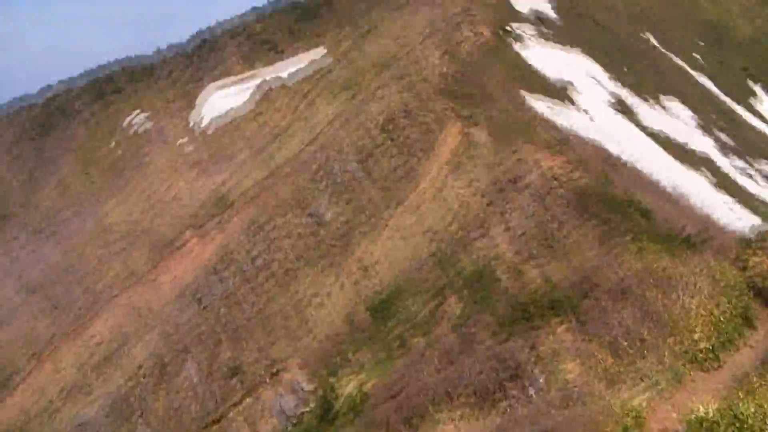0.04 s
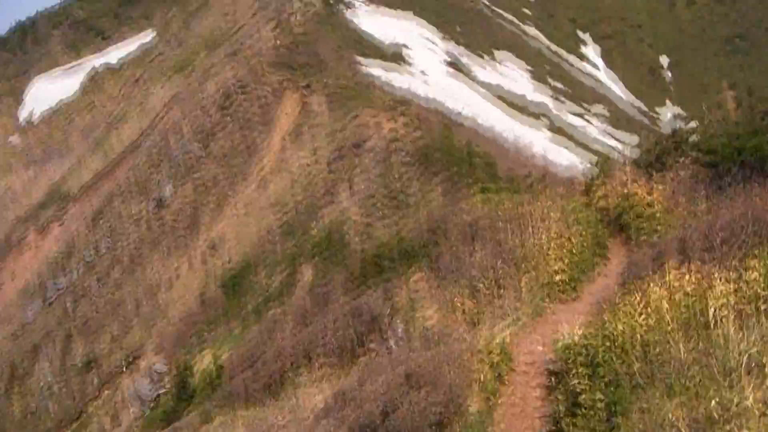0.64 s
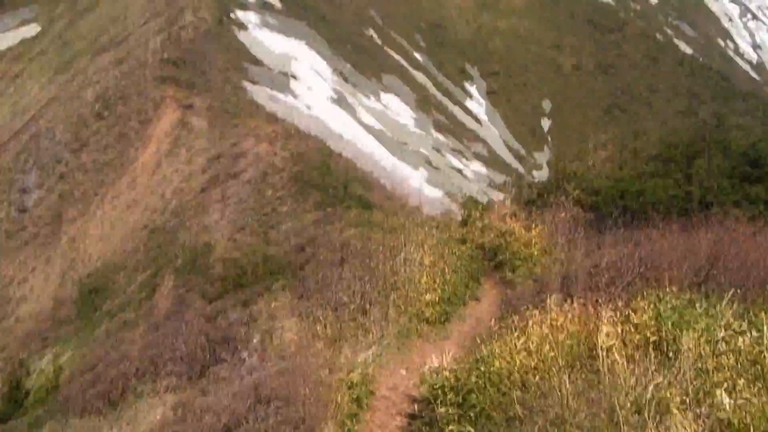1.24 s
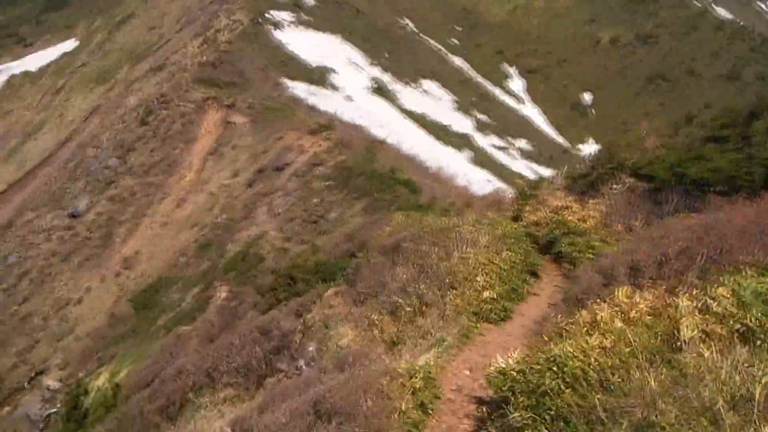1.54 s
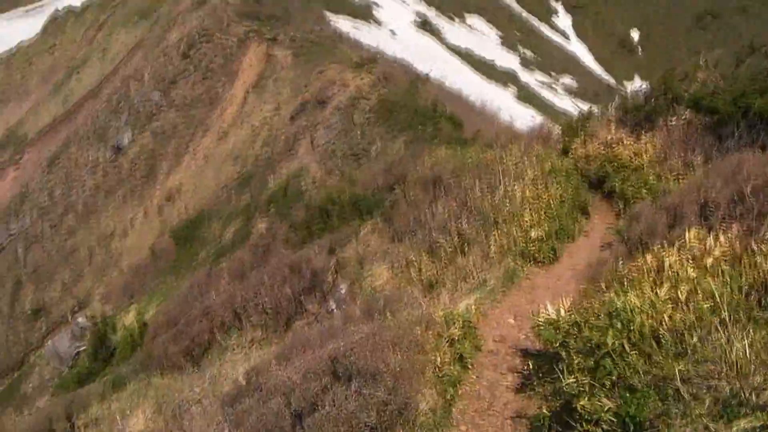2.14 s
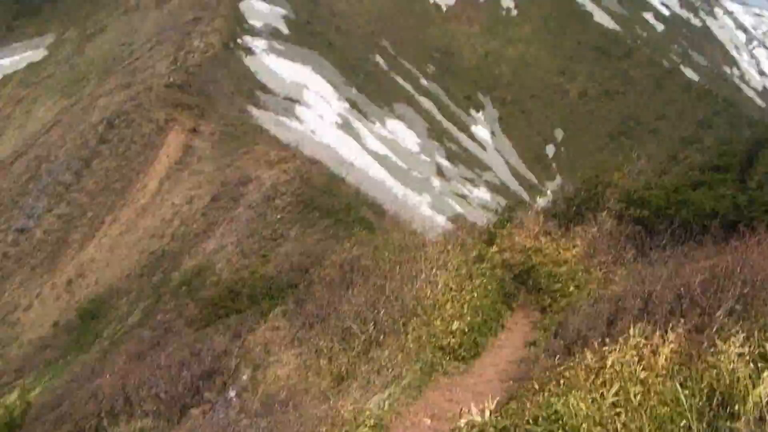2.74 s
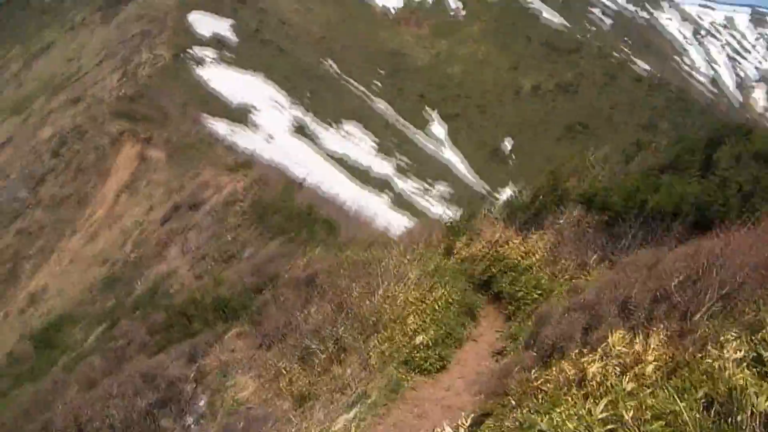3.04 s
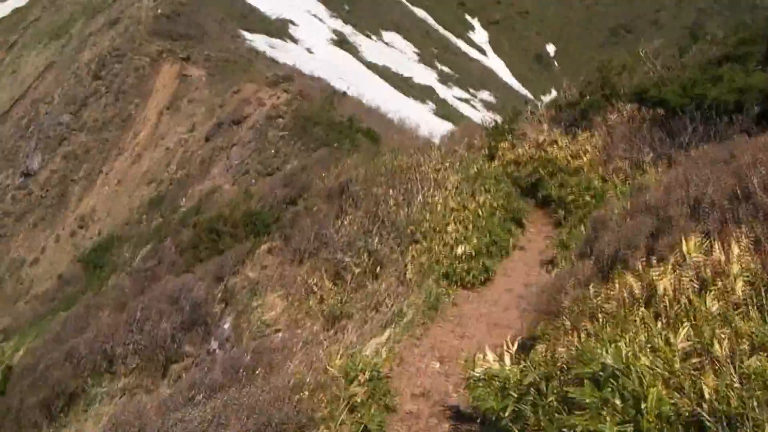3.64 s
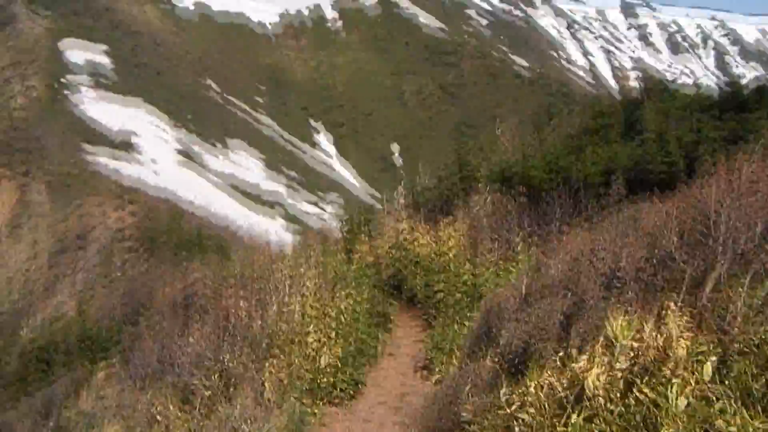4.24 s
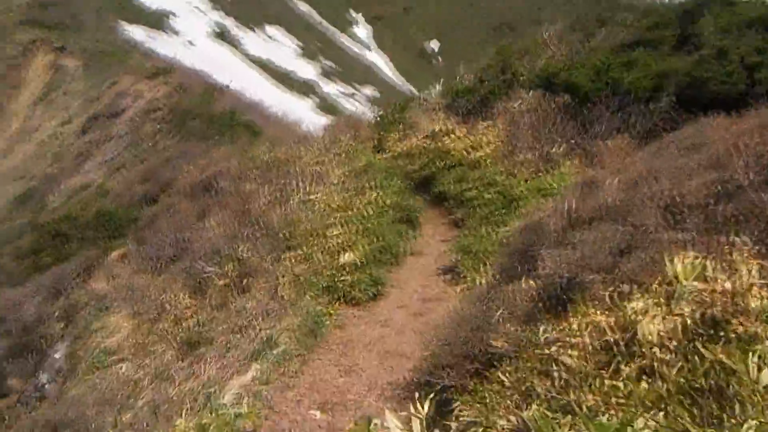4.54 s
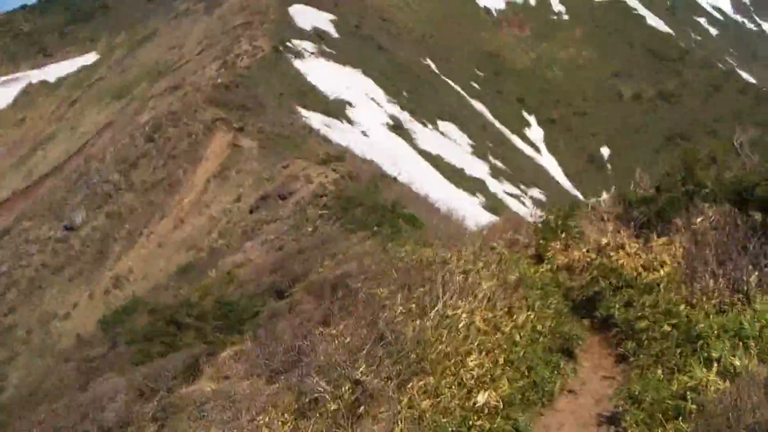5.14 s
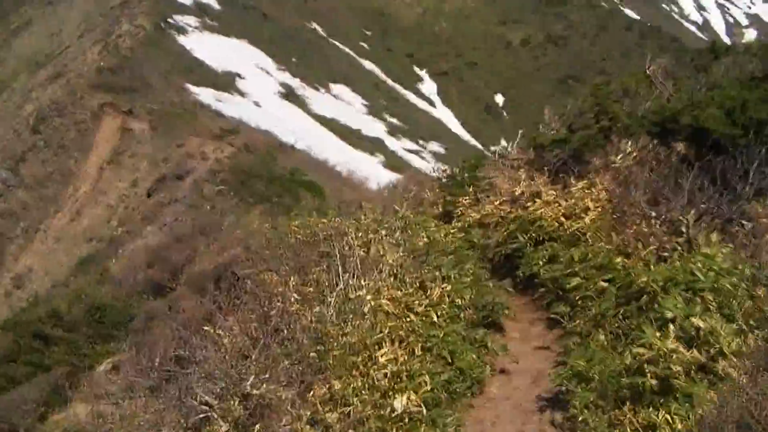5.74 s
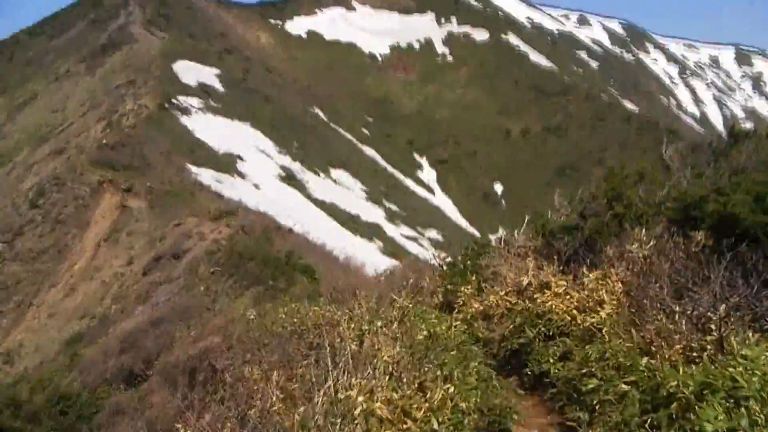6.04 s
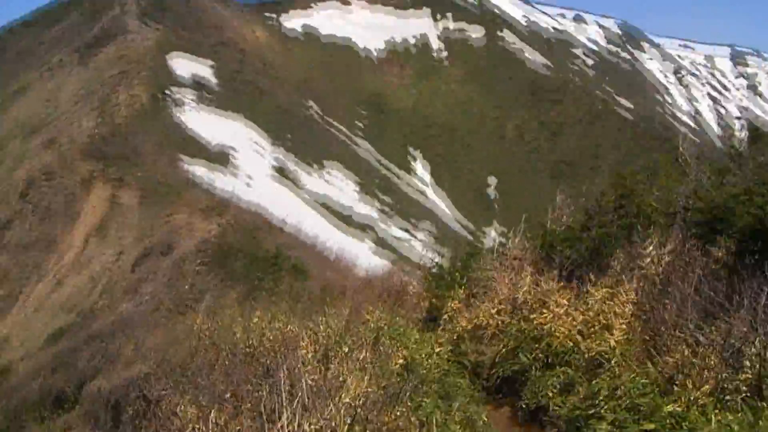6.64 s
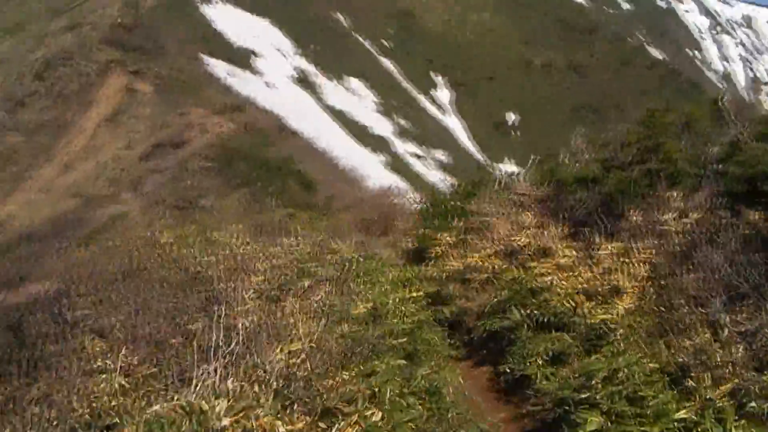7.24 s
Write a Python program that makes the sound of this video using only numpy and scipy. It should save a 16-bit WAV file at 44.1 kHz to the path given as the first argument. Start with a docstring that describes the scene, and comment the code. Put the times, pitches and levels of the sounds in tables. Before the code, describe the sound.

A small, high metal bell jingles unevenly on a walker's pack, its ring wavering as it swings. Boots crunch steadily on a gritty mountain trail and knock loose stones. In the second half, brush and twigs rustle against clothing and gear bumps near the microphone. Light wind rumbles now and then over a quiet hiss. Everything is close, in open air with no echo.

```python
"""A small metal bell swings from a walker's pack on a dirt mountain trail.
Its clapper strikes and rolls along the rim, and the ringing wavers as the bell swings and turns.
Boots crunch on grit and knock stones, gear bumps near the microphone, clothes and brush rustle,
and there are a few faint squeaks. Light wind rumbles on the microphone over the slope's quiet hiss."""
import sys
import numpy as np
from scipy import signal
from scipy.io import wavfile

SR = 44100
rng = np.random.default_rng(int(sys.argv[2]) if len(sys.argv) > 2 else 0)


def inscribe(sig):
    """Save sig as 16-bit PCM at rate SR to the path in sys.argv[1].

    A 1-D sig is mono; a 2-D sig holds one channel per row.
    Samples are clipped to [-1, 1] before scaling.
    """
    pcm = np.round(np.clip(np.atleast_2d(sig).T, -1, 1) * 32767)
    wavfile.write(sys.argv[1], SR, pcm.astype(np.int16))


N = 322371

# Levels are relative: other gains act on them later. A t60 is the seconds a sound takes to fade by 60 dB.
# the bell's tones, each with a twin just above it: pitch_hz, twin_gap_hz, level_db, t60_s, left_lead_db
BELL_TONES = [(3369, 23, 9, 0.98, -0.5), (7028, 17.93, 4.5, 1.18, -6), (9784, 12.7, -2.5, 0.97, -2.5),
              (12360, 15.8, -0.5, 0.27, -15), (12525, 21.2, -2.5, 0.69, 2), (13500, 18, -17.5, 0.54, 22),
              (14425, 32, -12.5, 0.59, -14)]
# clean hits of the clapper: start_s, first_tone_db, second_tone_db, top_tones_db, clink_db
CLAPPER_STRIKES = [(0.013, -35.5, -29, -39.5, -22.5), (0.123, -60, -35.5, -46.5, -38),
                   (0.376, -54, -54.5, -55, -42), (0.73, -41, -40, -44.5, -28),
                   (1.446, -66, -59, -49.5, -33.5), (2.0764, -35, -28.5, -36, -20),
                   (2.37, -54.5, -64, -51.5, -60), (2.972, -41.5, -45, -45.5, -30),
                   (3.279, -53, -53, -58, -43), (3.568, -48, -42, -49, -40.5),
                   (4.343, -46, -38, -39.5, -42), (4.697, -52.5, -53, -51.5, -45),
                   (5.025, -45.5, -41, -45.5, -52), (5.584, -43, -34.5, -36.5, -34),
                   (6.064, -45.5, -40, -40.5, -38), (6.169, -40, -38, -40, -40),
                   (6.638, -44.5, -36.5, -43, -47)]
# the clapper rolls softly along the rim: start_s, first_tone_db
CLAPPER_ROLLS = [(1.803, -56), (4.45, -57.5), (4.79, -56), (5.628, -41.5), (5.69, -38), (5.805, -55),
                 (5.881, -47), (6.218, -51), (6.71, -42), (7.168, -55.5)]
# the bell brushes the pack, which muffles it: start_s, loss_db
PACK_TOUCHES = [(0.087, 9), (.835, 4.5), (2.33, 4), (4.405, 16), (6.135, 1.5)]
# how widely the bell swings: time_s, size_db
SWING_SIZE = [(2.4, -3), (4.1, -2), (4.4, 2.5)]
# footsteps: start_s, landing_s, grit_db, clothes_db, jolt_db
FOOTSTEPS = [(-0.03, 0.0064, -47.5, -59.5, -41), (0.596, 0.028, -52.5, -52, -57),
             (1.336, 0.012, -43, -55, -48), (1.921, 0.011, -44.5, -61, -47.5),
             (2.847, 0.042, -53, -52.5, -47.5), (3.42, 0.075, -49, -64, -61),
             (4.222, 0.037, -45.5, -48.5, -54), (4.884, 0.023, -39, -49.5, -42),
             (5.442, 0.0082, -43, -58, -68), (5.957, 0.071, -45, -54, -42), (6.503, 0.021, -41, -85, -45),
             (7.069, 0.055, -45, -64, -36)]
# toes scuff the ground: start_s, level_db
TOE_SCUFFS = [(.85, -65.5), (2.04, -49), (4.466, -50.5), (5.66, -52.5), (6.19, -50), (6.29, -56)]
# tone colour of the grit: pitch_hz, level_db
GRIT_COLOUR = [(45, -13), (150, 3), (280, -8), (400, 8.5), (700, -1.5), (1300, -1.5), (2300, -5),
               (4500, -15), (8000, -10), (15500, -51)]
# gravel gives way under a boot: start_s, length_s, level_db, centre_hz
GRAVEL_CRUNCHES = [(1.347, 0.033, -40, 815), (1.958, 0.021, -40, 740), (2.893, 0.025, -42.5, 1680),
                   (4.241, 0.016, -47, 900), (5.999, 0.027, -37, 700), (7.111, 0.01, -37.5, 990),
                   (7.141, 0.011, -27.5, 910)]
# knocked stones: start_s, level_db, pitch_hz
STONE_KNOCKS = [(0.6323, -19.5, 2620), (0.6409, -22.5, 1480), (1.385, -23.5, 1150), (2.28, -31.5, 1660),
                (2.707, -36, 2060), (4.255, -20, 970), (4.835, -24, 1720), (5.185, -36, 1740),
                (5.234, -30.5, 1240), (5.472, -26, 800), (5.518, -16.5, 1230), (5.69, -28.5, 586),
                (5.996, -21, 660), (6.047, -25, 1060), (6.337, -23, 2500), (7.059, -28, 1790),
                (7.196, -23.5, 1260), (7.237, -23.5, 3760)]
# gear bumps near the microphone: start_s, thud_db, knock_db, click_db
GEAR_BUMPS = [(1.349, -39, -21.5, -28), (1.368, -20, -23.5, -47), (2.053, -26, -41, -60),
              (3.967, -40, -55, -70), (4.234, -27, -30, -55), (4.276, -40, -26.5, -40),
              (4.9157, -17.5, -6, -11), (4.9426, -19, -7.5, -6), (5.449, -28, -32, -48),
              (6.046, -36, -22.5, -31), (6.076, -14.5, -29.5, -51), (6.17, -23, -33, -58),
              (6.218, -13.5, -34, -49), (7.081, -19, -25, -45), (7.098, -33, -21.5, -53),
              (7.123, -20.5, -35, -50), (7.183, -17.5, -32, -55), (7.207, -26, -19.5, -50)]
# brush drags along the clothes: start_s, hold_s, level_db
BRUSH_DRAGS = [(1.628, 0.023, -53.5), (4.294, 0.025, -51), (4.788, 0.11, -52.5), (5.553, 0.12, -50),
               (5.755, 0.13, -56), (6.157, 0.14, -47.5), (6.331, 0.017, -49), (6.713, 0.031, -53),
               (7.112, 0.15, -61)]
# tone colour of the rustle: pitch_hz, level_db
CLOTH_COLOUR = [(1500, 0), (4500, -0.5), (6000, -2.5), (7500, 9), (8800, 5.5), (11000, 0.5), (13500, -12),
                (15500, -37)]
# twigs flick the clothes: start_s, level_db
TWIG_FLICKS = [(0.6318, -38), (0.668, -41), (4.103, -47), (4.228, -38.5), (4.274, -24.5), (4.318, -31),
               (4.836, -46), (4.943, -19.5), (5.899, -33), (7.151, -25)]
# faint squeaks: start_s, length_s, start_hz, end_hz, level_db
SQUEAK_GLIDES = [(2.545, 0.072, 1920, 1620, -59), (3.914, 0.061, 1810, 2080, -57),
                 (4.794, 0.031, 1590, 2140, -45)]
# strength of the breeze: time_s, level_db
BREEZE = [(0, -49.5), (0.87, -57), (0.98, -69.5), (1.3, -52), (1.58, -59), (1.75, -74), (3.55, -64),
          (4.7, -64), (5.3, -56.5), (6.5, -55), (7.3, -53.5)]
# gusts on the microphone: start_s, hold_s, level_db
WIND_GUSTS = [(4.974, 0.039, -43), (6.068, 0.1, -37.5), (7.045, 0.18, -36)]
# tone colour of the wind's rumble: pitch_hz, level_db
RUMBLE_COLOUR = [(25, -29), (45, -8.5), (105, 9), (160, -2), (270, -27.5), (400, -14.5), (650, -25),
                 (1500, -59)]
# tone colour of the slope's hiss: pitch_hz, level_db
AIR_COLOUR = [(40, 0), (100, 8.5), (200, -33), (280, -52), (420, -8), (700, -17.5), (1300, -13),
              (2300, -11.5), (4500, -14.5), (8000, -13.5), (15500, -24)]
# how alike the noise is on the left and right: pitch_hz, likeness (1 = the same)
STEREO_LIKENESS = [(40, 0.98), (400, 0.95), (2300, .99), (5000, 0.89), (14000, 0.18)]


def bell(weak_twin=0.48, swell_s=0.00055, touch_s=0.036, hum_db=-61, hum_fall_db=9):
    """Each hit rings pairs of close tones that throb together; swinging and turning make them waver."""
    t, out = np.arange(2 * SR) / SR, np.zeros((2, N))
    clock = np.arange(N) / SR
    # every touch of the pack takes energy out of whatever is ringing
    kept = from_db(-sum(loss_db * np.clip((clock - s) / touch_s, 0, 1) for s, loss_db in PACK_TOUCHES))
    swing = gain_curve(SWING_SIZE)
    travel_m = bell_travel(swing)
    hits = clapper_hits()
    balance = np.array([[1], [weak_twin]])
    for k, (hz, gap_hz, tone_db, t60, left_db) in enumerate(BELL_TONES):
        # the lowest pair sounds at once; the others swell while the clapper chatters
        shape = fade(t, t60) * (1 if k == 0 else 1 - np.exp(-t / swell_s))
        pair_hz = np.array([[hz], [hz + gap_hz]])
        pair = shape * np.exp(2j * np.pi * pair_hz * t)
        twins = np.zeros((2, N), complex)
        for s, *levels_db, rise_s in hits:
            phase, spot = rng.random(2)
            shares = balance if spot < .5 else balance[::-1]  # the spot hit decides which twin leads
            # earlier touches do not weaken a new hit
            strength = from_db(levels_db[min(k, 2)] + tone_db) / kept[round(s * SR)]
            onset = 1 - np.exp(-t / rise_s)
            add(twins, s, strength * np.exp(2j * np.pi * phase) * shares * onset * pair)
        # the clapper keeps grazing the rim, so the low tones never quite fall silent
        hum = from_db(hum_db - k * hum_fall_db) * balance * np.exp(2j * np.pi * pair_hz * clock)
        twins = twins * kept + hum
        # turning speeds and slows the throb; swinging bends the pitch
        twist = np.exp(1j * swing * drift(rate_hz=6))
        bend = np.exp(2j * np.pi * hz * travel_m / 343)  # sound travels 343 m/s
        ringing = (twins[0] * twist + twins[1] / twist) * bend
        pan = from_db([[left_db / 2], [-left_db / 2]])
        out += np.real(ringing * body_reflections(hz, swing)) * pan
    return out


def clapper_hits(hard_rise_s=0.0005, hard_clink_db=-29, roll_rise_s=0.014):
    """List strikes and rolls as: start_s, first_tone_db, second_tone_db, top_tones_db, rise_s."""
    # the weaker the clink, the more slowly the ring swells
    strikes = [(*hit, hard_rise_s * from_db(hard_clink_db - db)) for *hit, db in CLAPPER_STRIKES]
    rolls = [(s, db, db - 2.5, db - 1, roll_rise_s) for s, db in CLAPPER_ROLLS]
    return strikes + rolls


def bell_travel(swing, lurch=0.7, period_s=0.6, lurch_t60=1.4, sway=0.007):
    """Metres moved towards the microphone: the bell sways, and lurches to and fro after each strike."""
    t, speed = np.arange(2 * SR) / SR, np.zeros(N)
    for s, *_ in CLAPPER_STRIKES:
        add(speed, s, lurch * np.sin(2 * np.pi * t / period_s) * fade(t, lurch_t60))
    return np.cumsum(swing * speed) / SR + sway * swing * drift(rate_hz=7.7)


def body_reflections(hz, swing, scatter=0.8, apart=0.87):
    """Sound bouncing off the walker keeps shifting, a bit differently on each side; high tones most."""
    pitch_ratio = hz / BELL_TONES[1][0]
    rate_hz = 14 * pitch_ratio
    shared, left, right = [(drift(rate_hz) + 1j * drift(rate_hz)) / np.sqrt(2) for _ in range(3)]
    depth = scatter * pitch_ratio * swing
    width = apart * pitch_ratio ** 2 / 2
    return (1 + depth * shared + width * np.array([left, right])) / np.sqrt(1 + depth ** 2 + width ** 2)


def clapper(buzz_db=0.5, buzz_t60=0.11, clink_hz=3330, clink_t60=0.027):
    """A clean hit on the rim gives a metal clink and a short bright buzz."""
    t, out = np.arange(SR // 8) / SR, np.zeros((2, N))
    clink = np.sin(2 * np.pi * clink_hz * t) * fade(t, clink_t60)
    for s, _, _, top_db, clink_db in CLAPPER_STRIKES:
        buzz = band(stereo_noise(len(t), width=.5), 5200, 15000, order=1) * fade(t, buzz_t60)
        add(out, s, from_db(top_db + buzz_db) * buzz + from_db(clink_db) * clink)
    return out


def boots(grit_db=0.5, sole_db=-11):
    """Grit cracks in tiny clumps as the heel lands, the sole rolls on and now and then a toe scuffs."""
    clumps = from_db(drift(rate_hz=75))
    cracks = [grains(per_s=450, spread_db=3.5, smooth=0.49) * clumps for _ in range(2)]
    presses = [swell(s, db, rise_s=0.017, hold_s=0, t60=0.97) for s, db in TOE_SCUFFS]
    for s, landing_s, db, _, _ in FOOTSTEPS:
        heel = swell(s, db, landing_s, hold_s=0, t60=0.7)
        sole = swell(s, db + sole_db, landing_s, hold_s=0.074, t60=2.87)
        presses += [heel, sole]
    return from_db(grit_db) * together(presses) * coloured(cracks, GRIT_COLOUR, flicker_db=2.5)


def gravel(spread_octaves=0.566, ring_cycles=3.2, count=24):
    """Gravel collapses under a boot: a tight cluster of pebbles, each ringing briefly at its own pitch."""
    t, out = np.arange(SR // 12) / SR, np.zeros(N)
    for s, length_s, db, centre_hz in GRAVEL_CRUNCHES:
        age_s = np.maximum(t - length_s * rng.random((count, 1)), 0)
        hz = centre_hz * 2 ** (spread_octaves * rng.standard_normal((count, 1)))
        pebbles = np.sin(2 * np.pi * hz * age_s) * fade(age_s, ring_cycles / hz)
        crunch = np.sum(rng.choice([-1, 1], (count, 1)) * pebbles, axis=0)
        strength = np.sqrt(np.sum(crunch ** 2) / (length_s * SR))
        add(out, s, from_db(db) * crunch / strength)
    return out


def stones(ring_db=-1, ring_cycles=11.4, crack_db=-9, crack_t60=0.0092):
    """A knocked stone rings for a few cycles while the grit under it cracks."""
    t, out = np.arange(SR // 16) / SR, np.zeros(N)
    for s, db, hz in STONE_KNOCKS:
        ring = np.sin(2 * np.pi * hz * t) * fade(t, ring_cycles / hz)
        crack = unit_level(band(rng.standard_normal(len(t)), 390, 2020)) * fade(t, crack_t60)
        add(out, s, from_db(db) * (from_db(ring_db) * ring + from_db(crack_db) * crack))
    return out


def gear(thud_hz=125, overtone_hz=235, overtone_db=-9, knock_hz=385, clack_hz=2550, padding_hz=560):
    """Gear rocks against the microphone's case, giving a low thud, a muffled knock and a hard click."""
    t, out = np.arange(SR // 8) / SR, np.zeros(N)
    overtone = from_db(overtone_db) * np.sin(2 * np.pi * overtone_hz * t)
    thud = (np.sin(2 * np.pi * thud_hz * t) + overtone) * fade(t, t60=0.041)
    knock = np.sin(2 * np.pi * knock_hz * t) * fade(t, t60=0.026)
    clack = np.sin(2 * np.pi * clack_hz * t) * fade(t, t60=0.005)
    for k, (s, thud_db, knock_db, click_db) in enumerate(GEAR_BUMPS):
        click = .5 * clack + band(rng.standard_normal(len(t)), 690, 1900, order=1) * fade(t, t60=0.016)
        padded = band(from_db(thud_db) * thud + from_db(knock_db) * knock, 77, padding_hz, order=3)
        add(out, s, (-1) ** k * (padded + from_db(click_db) * click))  # to and fro: the sign flips
    return out


def rustle(cloth_db=5.0, clump_db=1.5):
    """Clothes swish with every step and brush drags along them, making a fine bright grain."""
    fibres = [grains(per_s=4000, spread_db=4.5, smooth=.7) for _ in range(2)]
    swishes = [swell(s, db, rise_s=0.019, hold_s=0.017, t60=0.87) for s, _, _, db, _ in FOOTSTEPS]
    drags = [swell(s, db, rise_s=0.038, hold_s=hold_s, t60=0.21) for s, hold_s, db in BRUSH_DRAGS]
    clumps = from_db(cloth_db + clump_db * drift(rate_hz=43))
    return clumps * together(swishes + drags) * coloured(fibres, CLOTH_COLOUR, flicker_db=4.5)


def twigs(snap_t60=0.016, low_hz=4500, high_hz=12500):
    """Dry twigs flick against the clothes with a short bright snap."""
    t, out = np.arange(SR // 16) / SR, np.zeros((2, N))
    for s, db in TWIG_FLICKS:
        snap = band(stereo_noise(len(t), width=0.31), low_hz, high_hz)
        add(out, s, from_db(db) * snap * fade(t, snap_t60))
    return out


def squeaks():
    """Short soft tones slide up or down."""
    out = np.zeros(N)
    for s, length_s, start_hz, end_hz, db in SQUEAK_GLIDES:
        hz = np.linspace(start_hz, end_hz, round(length_s * SR))
        tone = np.sin(2 * np.pi * np.cumsum(hz) / SR)
        add(out, s, from_db(db) * np.hanning(len(hz)) * tone)
    return out


def wind(rumble_db=4.5, breeze_db=-1):
    """Air rumbles on the microphone: a light breeze, short gusts and a jolt with every step."""
    breeze = from_db(breeze_db) * gain_curve(BREEZE)
    jolts = [swell(s, db, landing_s, hold_s=0, t60=0.35) for s, landing_s, _, _, db in FOOTSTEPS]
    gusts = [swell(s, db, rise_s=0.019, hold_s=hold_s, t60=0.12) for s, hold_s, db in WIND_GUSTS]
    rumble = coloured(rng.standard_normal((2, 2, N)), RUMBLE_COLOUR, flicker_db=6.0)
    return from_db(rumble_db) * together([breeze] + jolts + gusts) * rumble


def slope_air(level_db=-57.0):
    """The air of the open slope hisses quietly all the time."""
    return from_db(level_db) * coloured(rng.standard_normal((2, 2, N)), AIR_COLOUR, flicker_db=2.0)


def from_db(db):
    """Turn decibels into a gain to multiply by."""
    return 10 ** (np.asarray(db) / 20)


def unit_level(x):
    """Scale a sound to an average power of 1."""
    return x / np.sqrt(np.mean(x ** 2) + 1e-20)


def gain_curve(rows):
    """Gain at every sample, from rows of time_s, level_db."""
    return from_db(np.interp(np.arange(N) / SR, *np.transpose(rows)))


def at_hz(rows, hz):
    """Read a table's value at one pitch."""
    pitches_hz, values = np.transpose(rows)
    return np.interp(np.log(hz), np.log(pitches_hz), values)


def band(x, low_hz, high_hz, order=2):
    """Keep the sound between two pitches."""
    edges_hz = [low_hz, min(high_hz, .45 * SR)]
    return signal.sosfilt(signal.butter(order, edges_hz, "band", fs=SR, output="sos"), x)


def add(out, start_s, sound):
    """Mix a sound in from start_s."""
    start = max(round(start_s * SR), 0)
    part = sound[..., :max(N - start, 0)]
    out[..., start:start + part.shape[-1]] += part


def fade(t, t60):
    """Gain that falls by 60 dB every t60 seconds."""
    return np.exp(-np.log(1000) * t / t60)


def swell(start_s, db, rise_s, hold_s, t60):
    """Gain that rises to db, holds and dies away."""
    t = np.arange(N) / SR - start_s
    return from_db(db) * np.clip(t / rise_s, 0, 1) * fade(np.maximum(t - rise_s - hold_s, 0), t60)


def together(gains):
    """Unrelated sounds add in power."""
    return np.sqrt(sum(gain ** 2 for gain in gains))


def drift(rate_hz):
    """A smooth random wander, about 1 in size."""
    hop, warm_up = 40, 2000  # one value every 40 samples; the first 2000 values are dropped
    memory = np.exp(-2 * np.pi * hop * rate_hz / SR)
    noise = rng.standard_normal(N // hop + warm_up + 2)
    slow = signal.lfilter([1], [1, -2 * memory, memory ** 2], noise)[warm_up:]
    return np.interp(np.arange(N) / hop, np.arange(len(slow)), unit_level(slow))


def grains(per_s, spread_db, smooth):
    """Tiny clicks of uneven size over smooth noise, as a middle and a side signal."""
    sizes = from_db(spread_db * np.minimum(rng.exponential(1, N), 4))
    clicks = (rng.random(N) < per_s / SR) * sizes * rng.choice([-1, 1], (2, N))
    return unit_level(clicks) + smooth * rng.standard_normal((2, N))


def stereo_noise(samples, width):
    """Noise shared by left and right, plus a little of each side's own."""
    return rng.standard_normal(samples) + width * rng.standard_normal((2, samples))


def coloured(noises, colour, flicker_db):
    """Two middle-and-side noises take turns feeding half-octave bands, each flickering on its own."""
    out, edges_hz = 0, 22.5 * 2 ** np.arange(0, 9.6, .5)
    for k, (low_hz, high_hz) in enumerate(zip(edges_hz, edges_hz[1:])):
        middle, side = band(noises[k % 2], low_hz, high_hz)
        hz = np.sqrt(low_hz * high_hz)
        alike = np.clip(at_hz(STEREO_LIKENESS, hz), -1, 1)
        stereo = np.sqrt(1 + alike) * middle + np.sqrt(1 - alike) * side * [[1], [-1]]
        out = out + from_db(at_hz(colour, hz) + flicker_db * drift(rate_hz=25.4)) * stereo
    return unit_level(out)


def scene():
    """Everything is close by in the open air, with no echo."""
    walker = bell() + clapper() + boots() + gravel() + stones() + gear() + squeaks() + rustle() + twigs()
    return walker + wind() + slope_air()


def record(dry, dip_hz=7880, cutoff_hz=15800):
    """The microphone has a narrow dip in the treble, and the very top is cut off."""
    dipped = signal.lfilter(*signal.iirnotch(dip_hz, Q=45, fs=SR), dry)
    return signal.sosfilt(signal.ellip(10, .3, 90, cutoff_hz, fs=SR, output="sos"), dipped)


dry = scene()
out = record(dry)
inscribe(out)
```